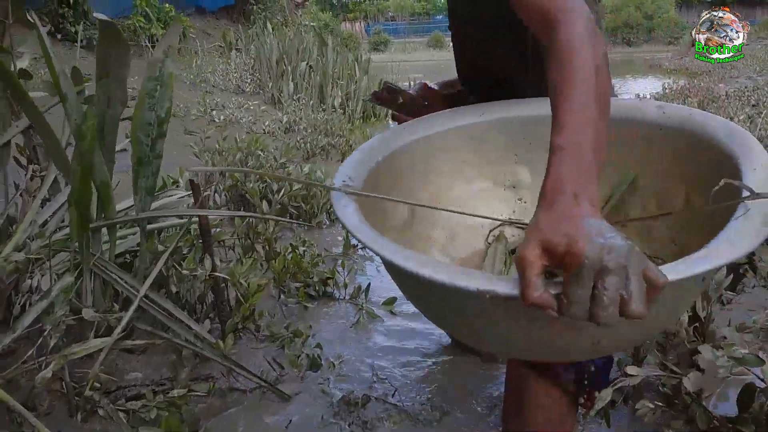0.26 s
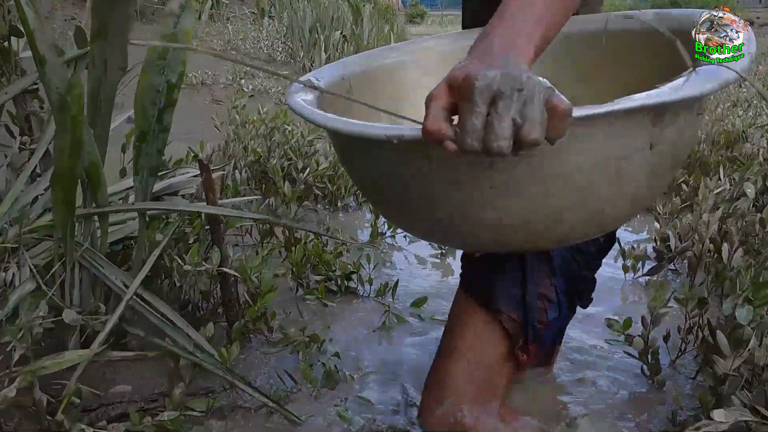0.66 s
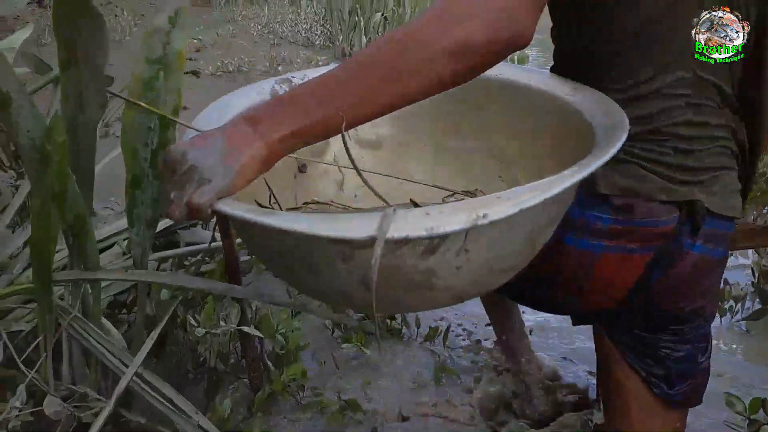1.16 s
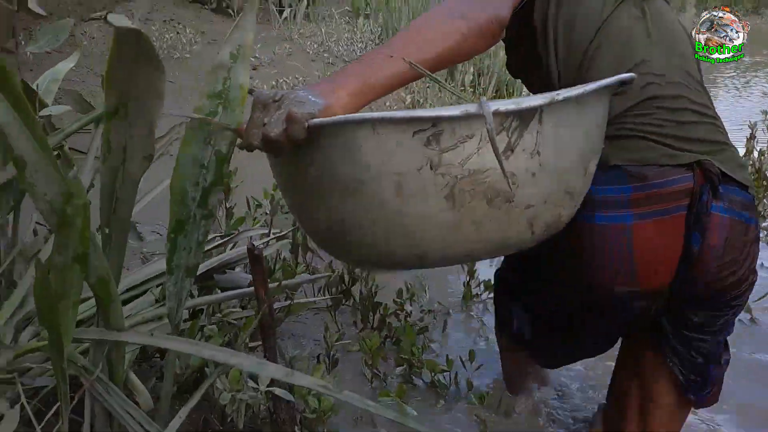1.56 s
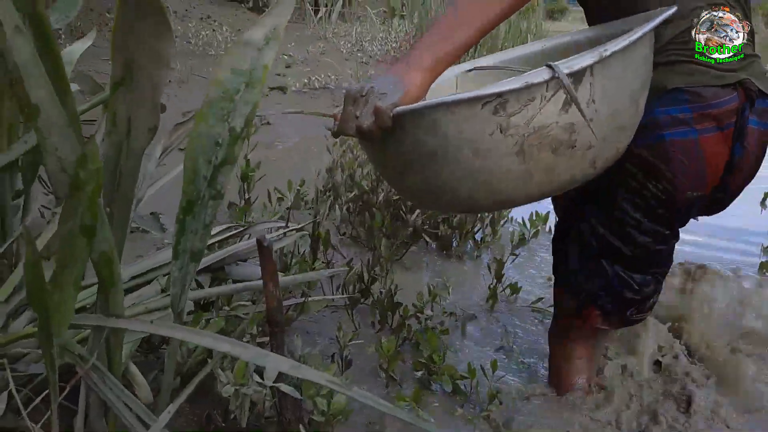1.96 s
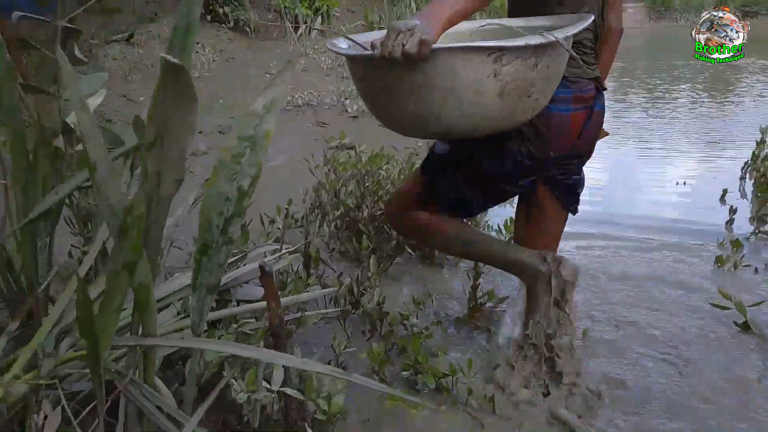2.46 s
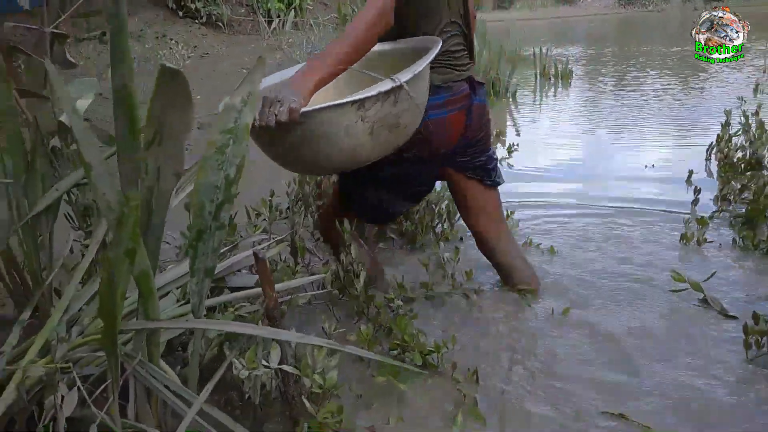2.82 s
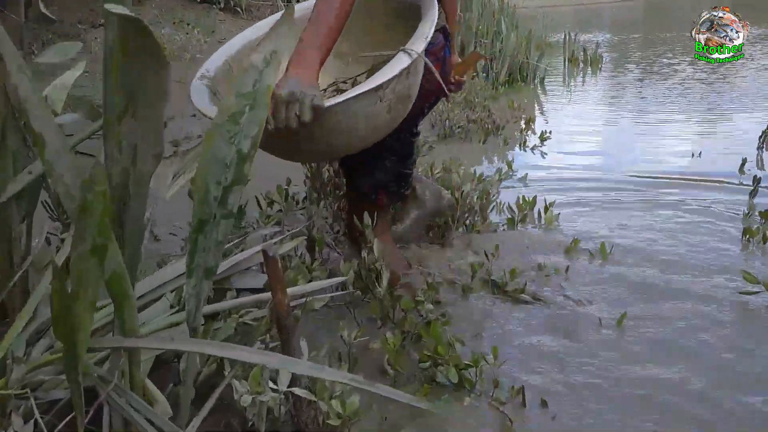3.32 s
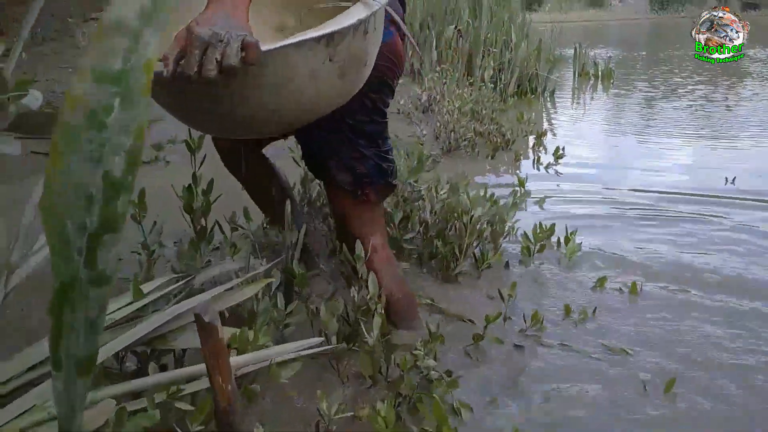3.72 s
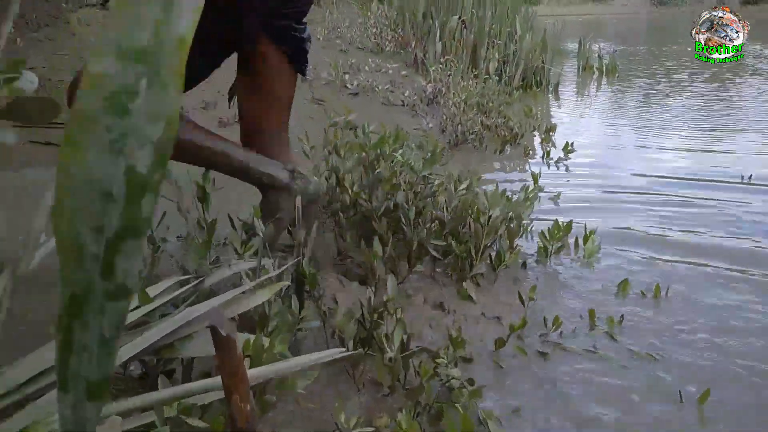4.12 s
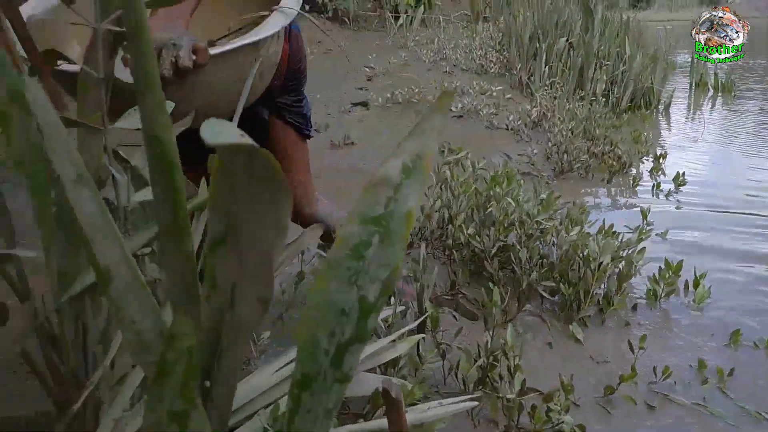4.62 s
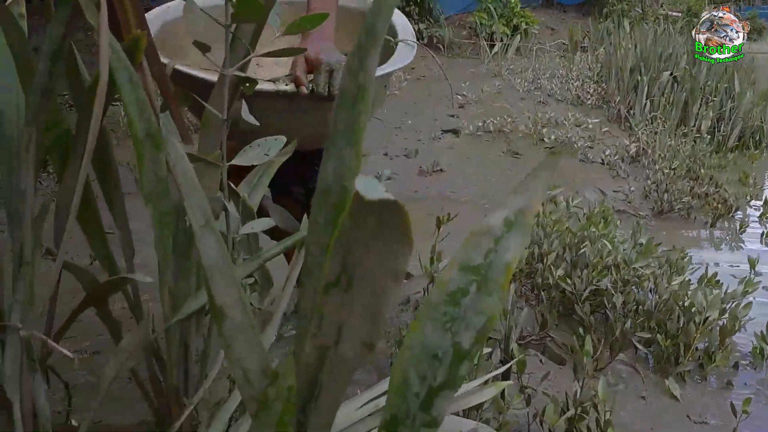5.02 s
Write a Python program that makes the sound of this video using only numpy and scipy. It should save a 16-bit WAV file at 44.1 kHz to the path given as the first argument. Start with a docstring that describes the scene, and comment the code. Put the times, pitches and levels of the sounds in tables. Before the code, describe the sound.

Someone trudges through muddy shallows and plants, crackling and squelching, with two dull heavy steps, a leaf judder and faint metal basin knocks in the wind.

```python
"""Someone wades barefoot through wet mud and low plants at a pool's edge, carrying a metal basin.
Wind rumbles throughout; from the start, swept noise and tiny ticks make each stride swish and squelch.
Stalks snap as short rings with noise bursts, and mud pockets pop as brief rising notes.
After a quieter stretch, two heavy steps thud as damped low sines with churning noise.
By the second a leaf judders in slip pulses; then leaves knock the basin's modes, and a light step lands."""
import sys
import numpy as np
from scipy import signal
from scipy.fft import rfft, irfft, next_fast_len
from scipy.io import wavfile
from scipy.ndimage import uniform_filter1d, map_coordinates

SR = 44100
rng = np.random.default_rng(int(sys.argv[2]) if len(sys.argv) > 2 else 0)


def output_pcm(signal):
    """Save a mono or channel-first signal as 16-bit PCM at the path in sys.argv[1].

    Samples are clipped to [-1, 1] before scaling.
    """
    pcm = np.clip(np.atleast_2d(signal).T, -1, 1) * 32767
    wavfile.write(sys.argv[1], SR, np.round(pcm).astype(np.int16))


N = 232774
T = np.arange(SR // 4) / SR  # time within one event, s
TOP_HZ = 15800  # upper band limit

# Wind on the microphone: t/s, rumble level before a fixed gain/dB
WIND_LEVEL = [(0.0, -63.5), (0.15, -59.5), (0.81, -61.5), (1.13, -63), (1.45, -61), (2.34, -61),
              (2.7, -56.5), (3.47, -59.5), (4.06, -58), (4.32, -54), (4.66, -62), (4.97, -59.5),
              (5.28, -62.5)]
# Short low buffets of wind: t/s, half length/s, boost/dB
WIND_BUFFETS = [(1.36, 0.072, 8.5), (1.564, 0.026, 13), (1.688, 0.059, 11), (1.826, 0.029, 10.5),
                (2.0, 0.055, 4.5), (2.657, 0.047, 0), (2.818, 0.037, 10), (2.89, 0.024, 12),
                (3.754, 0.056, 7), (4.696, .05, 6.5), (5.164, 0.094, 9.5)]
# Spectrum of the wind's rumble: f/Hz, level/dB
RUMBLE_SPECTRUM = [(12, -65), (20, -14), (53, -2.5), (71, -0.5), (106, -5), (128, -3.5), (195, -6),
                   (338, -21.5), (483, -30), (700, -30), (910, -86), (1540, -120)]
# Spectrum of the open air: f/Hz, level/dB
AIR_SPECTRUM = [(180, -39), (300, 0), (517, -20), (756, 1), (1640, -3.5), (2610, -11), (3020, -5),
                (6250, -14), (7250, -8), (9760, -19), (15500, -36)]
RUMBLE_GAIN_DB = 4
BUFFET_TOP_HZ, BUFFET_REST_DB = 117, -1.5  # buffets lift what lies below; deep gain between them

# Diffuse echo of the muddy bank: f/Hz, t60/s
BANK_DECAY = [(200, 0.48), (2000, 0.31), (10000, 0.05)]
# Correlation of left and right in diffuse sounds: f/Hz, correlation
DIFFUSE_CORRELATION = [(300, 1), (700, 0.12), (1400, 0.15), (3100, 0.66), (6800, -0.16), (15000, 0.25)]

# A leaf drags over the microphone housing: t/s, length before fade-out/s, level/dB, initial slip rate/Hz
LEAF_RUBS = [(4.273, 0.036, -53, 215), (4.314, 0.043, -38.5, 120), (4.362, 0.0325, -39.5, 110),
             (4.446, 0.016, -54, 140)]
# Spectrum of the rubbing: f/Hz, level/dB
RUB_SPECTRUM = [(60, -32), (130, 4), (270, -1), (400, -6.5), (630, -2.5), (850, -30), (1100, -17),
                (1330, -10), (1800, -20), (3000, -40), (8000, -70)]
RUB_SLOWING, RUB_EDGE_S = 0.12, 0.0047  # share of slip rate lost over a rub; fade-in and fade-out
RUB_GRIT = 0.51  # noise gain beside the slips

# Leaves strike the basin: t/s, relative level/dB, f/Hz, left-right level/dB, scrape level/dB, scrape t60/s
BASIN_KNOCKS = [(4.563, -39, 1120, 18, -2, .05), (4.5764, -28.5, 1200, 16, -22, 0.024),
                (4.5786, -32, 1940, 5, -11, 0.018), (4.5894, -39, 754, 2, 0, 0.035),
                (4.6386, -31.5, 2000, 6, -3.5, 0.033), (4.6572, -27.5, 2050, 11.5, -17, 0.052),
                (4.661, -34, 1010, 21, -11, .04), (4.6775, -29.5, 2110, 4, -3, 0.035),
                (4.679, -33.5, 1150, 4, -6.5, 0.12), (4.688, -40, 766, 7, 1, 0.048),
                (5.024, -43, 2120, 12, 0, 0.065), (5.032, -39.5, 890, 6, -5.5, 0.095),
                (5.09, -35.5, 980, 8, -9.5, 0.13), (5.111, -40, 980, 4, -3, 0.089),
                (5.1217, -38, 1850, 0, 0.5, 0.16), (5.129, -33.5, 2080, 6, 0, 0.063),
                (5.1351, -35.5, 1010, 19, 3.5, 0.037), (5.147, -34.5, 1080, 11, -10, .05),
                (5.149, -37, 2040, 10, -18, .03), (5.165, -41.5, 746, 4, -1, 0.14),
                (5.174, -40, 2100, 11, -4, 0.049), (5.186, -42.5, 850, 1, -12, .12)]
# Resonant modes of the basin: f/Hz, bandwidth/Hz, level/dB
BASIN_MODES = [(277, 47, 0.5), (727, 28, 1.5), (994, 24, 2.5), (1420, 29, -2), (1990, 41, 2.5),
               (2610, 32, 2), (3370, 110, -4)]
# Phase by which the basin's left side leads its right: f/Hz, phase/rad
BASIN_PHASE_LEAD = [(400, -0.8), (720, 1.5), (1000, 0.8), (1380, -2.5), (2000, -1.3), (2800, -1),
                    (6000, 1.5)]
# Spectrum of a leaf scraping the basin: f/Hz, level/dB
SCRAPE_SPECTRUM = [(150, 0.5), (350, -4.5), (800, -2.5), (2100, 0.5), (3500, -3), (8000, -20), (12000, -34)]
FLICK_DB, FLICK_T60_S = -5.5, 0.0063  # the leaf's own flick, heard beside the basin's ring

# Two heavy footfalls, each of several pushes, and a light one: t/s, relative level/dB, f/Hz, t60/s,
# left-right level/dB
FOOTFALLS = [(3.194, -31, 59, 0.059, -17), (3.207, -25.5, 87, 0.19, -21), (3.203, -25.5, 397, 0.034, -6),
             (3.2227, -20, 152, 0.075, -39), (3.23, -31, 233, 0.14, -13), (3.243, -31, 63.8, 0.26, -11),
             (3.263, -35, 312, 0.052, -2), (3.281, -30, 111, 0.04, -12), (4.328, -41, 206, 0.25, -18),
             (4.376, -25.5, 132, 0.051, -15), (4.392, -31, 150, .04, -13), (4.4, -14.5, 59.4, 0.081, -13),
             (4.473, -30.5, 33.2, 0.28, -11), (5.134, -34.5, 260, 0.042, -4.5)]
# Spectrum of the churning mud: multiple of the push frequency, level/dB
CHURN_SPECTRUM = [(.25, 13), (.7, 11), (1.3, 1), (2.5, -29), (8, -42), (30, -90)]
# Correlation of left and right in churning and rubbing noise: f/Hz, correlation
CHURN_CORRELATION = [(100, 0.46), (400, -0.5)]

# Air pockets in the mud ring on after they open: t/s, level/dB, initial f/Hz, t60/s, left-right level/dB
MUD_POCKETS = [(0.3231, -21.5, 1495, 0.016, -13), (0.3235, -23.5, 2050, 0.015, -18),
               (0.384, -38, 1397, 0.04, -4), (0.632, -31.5, 1230, 0.016, -2), (0.638, -41.5, 1726, 0.07, 0),
               (0.641, -47, 645, 0.16, -1), (0.427, -33.5, 3540, 0.027, 0), (1.26, -52, 1655, 0.13, -2),
               (1.331, -50, 1620, 0.21, -6), (4.245, -44, 760, 0.033, 17)]
POCKET_RISE_PER_S = 1  # share by which a pocket's pitch climbs as it shrinks

# Stalks snap and mud smacks: t/s, relative level/dB, f/Hz, left-right level/dB, relative crack level/dB,
# relative splinter level/dB, tearing t60/s
STALK_SNAPS = [(0.136, -31, 4860, -19, -20, -15, 0.015), (0.239, -36, 3430, 0, -7, -15.5, 0.018),
               (0.3228, -21.5, 1990, -27, -1, -16.5, 0.0073), (0.383, -37.5, 1620, -2, 1.5, -4.5, 0.035),
               (0.4106, -30, 7000, -2, -1.5, -15, .028), (0.426, -22, 3740, -2, -11, -22, 0.0058),
               (0.428, -32, 3700, 2, -11, -7.5, .014), (0.4455, -33, 5200, -3, -2, -13, .01),
               (0.631, -20.5, 2480, 0, -18, -13.5, 0.013), (0.6345, -37, 2880, -5, -12, -15, .015),
               (0.6532, -30.5, 4260, 2, -5, -11.5, 0.017), (0.689, -37.5, 1480, -5, -4, -13, .008),
               (0.7115, -34, 2560, -10, -4, -16, 0.0072), (0.8757, -36, 3830, 26, 4.5, -18, .006),
               (1.3805, -29, 1690, -1, -7, -16.5, 0.02), (2.5454, -29.5, 4440, -9, -6.5, -16, 0.005),
               (2.5549, -25.5, 4200, -11, -14, -16, 0.021), (2.5914, -36, 4500, -14, -7, -15, .008),
               (2.5963, -26, 3200, -8, 1, -15, 0.016), (2.643, -28.5, 4600, -5, 0, -18.5, 0.0071),
               (2.692, -29, 3850, -3, -10, -11.5, 0.01), (2.702, -30, 3700, -7, -10, -20, .007),
               (2.729, -32, 5300, -12, -6, -16, .018), (2.79, -46, 2000, -12, -9, -14, 0.0085),
               (2.816, -46, 3230, -17, -14, -14, 0.016), (2.838, -42, 2600, -17, -9, -13, 0.0089),
               (2.9603, -36, 2400, -18, -14, -19, .012), (3.0198, -31.5, 3320, -10, -14, -13.5, .008),
               (3.2034, -16, 2900, -8, 11, -33, 0.0045), (3.244, -36, 2170, -10, -9, -22, .004),
               (3.264, -29, 2470, -10, -7, -18.5, .007), (3.385, -37, 2500, -7, -14, -18, .014),
               (3.394, -37, 890, -11.5, -12, -15.5, 0.019), (3.414, -23.5, 4070, -21, -20, -16, 0.0068),
               (3.498, -35.5, 690, -22, -9, -16, 0.011), (3.5797, -43, 644, -12, -14, -9.5, 0.014),
               (4.018, -40.5, 820, -24, -12, -14, .008), (4.0864, -37.5, 5540, -9, -19, -21, 0.031),
               (4.1223, -44.5, 1130, 7, 0, -6, .01), (4.1863, -37.5, 6300, -14, 2, -6.5, 0.038),
               (4.243, -35, 1020, 15, -16, -15, 0.025), (4.255, -34, 2170, 7, -4, -11, .03),
               (4.3194, -26, 6550, -5, 3, -14.5, 0.014), (4.322, -24.5, 6000, -1, 7, -14, .026),
               (4.418, -30, 5600, -6, -5, -21, .015), (4.547, -38.5, 3400, 3, -7, -13, .006),
               (4.5664, -32.5, 8100, -3, 7, -20, 0.016), (4.5772, -33, 5700, -1, 9, -24, 0.0093),
               (4.6779, -32, 4200, 2, 1, -19, .01), (4.7353, -37, 3300, 7, 6, -20, 0.0099),
               (4.884, -39, 7740, -2, 10.5, -9.5, 0.017), (5.061, -33, 5140, 2, -6, -24, 0.023),
               (5.13, -25.5, 3400, 3, -13, -21, 0.034)]
# Spectrum of a stalk's crack: f/Hz, level/dB
CRACK_SPECTRUM = [(300, 18), (1200, -9), (2200, -15), (3000, 6), (5500, 6), (7500, 10.5), (9800, 11),
                  (11800, -10), (15500, -39)]
# Spectrum of splintering and of single drops and twigs: f/Hz, level/dB
SPLINTER_SPECTRUM = [(200, -4.5), (600, -3), (1500, 4), (3500, 7.5), (5500, 3), (7500, 7.5), (9500, -18),
                     (11500, -16), (15500, -57)]
SPLINTER_T60_S = 0.051
TEAR_REF_S = 0.015  # a tear this long is as strong as its first break

# A leg sweeps through wet leaves and mud: t of fastest motion/s, rise/s, fall/s, swish level/dB,
# squelch level/dB, hollow f/Hz, level of the bright part relative to swish/dB
LEG_SWEEPS = [(0.01, .1, 0.094, -58.5, -60, 1860, -6), (0.135, 0.43, 0.25, -57, -55.5, 1780, -0.5),
              (0.479, 0.19, 0.032, -47, -51, 2100, 5), (0.59, 0.26, 0.066, -49, -53, 1850, 1.5),
              (0.655, 0.034, 0.051, -44.5, -45.5, 1460, -2.5), (0.713, 0.032, 0.075, -47.5, -48, 1790, 3),
              (0.973, 0.031, 0.041, -55.5, -50, 1670, -2), (1.16, 0.21, 0.057, -60, -58, 1620, 5),
              (1.261, 0.044, 0.56, -54.5, -54.5, 1730, 1.5), (1.363, 0.18, 0.091, -49, -48.5, 1930, -0.5),
              (1.58, 0.045, 0.068, -60.5, -64.5, 1070, 2), (1.86, 0.46, 0.07, -71.5, -71.5, 980, 6.5),
              (2.06, 0.1, 0.075, -72, -70, 1166, 9.5), (2.405, 0.32, 0.75, -61.5, -69, 1530, -4),
              (2.694, 0.065, 0.086, -39.5, -46.5, 1990, -1.5), (2.825, 0.18, 0.13, -43.5, -48, 1300, -0.5),
              (2.96, 0.38, 0.26, -49.5, -53.5, 1670, -0.5), (3.15, 0.19, 0.37, -49.5, -75, 1450, -2.5),
              (3.26, 0.11, 0.042, -48.5, -52.5, 639, -10), (3.53, 1, 0.72, -54, -71, 1260, -6.5),
              (3.7, 0.35, 0.087, -56.5, -80, 1380, -2), (3.815, 0.1, 0.15, -52, -63, 1540, -5.5),
              (4.0, 0.3, 0.36, -61.5, -67, 1400, -6), (4.262, 0.16, 0.082, -46.5, -47, 1740, 1.5),
              (4.336, 0.11, 0.092, -38.5, -48, 1110, 3.5), (4.414, 0.053, 0.13, -37, -47, 1210, 1.5),
              (4.589, 0.041, 0.026, -40.5, -47.5, 1050, 1.5), (4.684, 0.083, 0.04, -50.5, -46.5, 1200, -7),
              (4.82, 0.39, 0.25, -53, -63, 1570, -1.5), (4.94, 0.099, 0.15, -51.5, -56, 1830, 6),
              (5.062, 0.065, 0.1, -46, -53, 1100, -1.5), (5.14, 0.088, 0.3, -48.5, -54.5, 1300, 1.5)]
# Place of the legs, wider once among the plants: t/s, left-right level/dB, width (0-1)
WALKER_PATH = [(0, -6, 0.8), (0.45, -2.5, 0.64), (1.4, -3.5, 0.64), (2.45, -4, 1), (2.8, -9, 1),
               (3.1, -5.5, 1), (3.95, -5.5, 1), (4.2, 2.5, 1), (5.28, 0.5, 1)]
# Spectrum of the swishing leaves: f/Hz, level/dB
SWISH_SPECTRUM = [(200, -2.5), (350, 4), (500, 2.5), (700, 9), (1000, -12.5), (1600, -7), (2600, -6.5),
                  (4000, -6.5), (5500, -5.5), (7300, -3.5), (9500, -11), (11200, -23), (14000, -27),
                  (15500, -43)]
SWEEP_DROP_DB, SWEEP_ROUNDNESS = 19.5, 0.88  # drop over one rise or fall; 1 = pointed, 2 = bell-shaped
TRICKLE_DB, TRICKLE_T60_S = -17, 2  # water runs off after each sweep
LAP_DB, LAP_HZ = -70.5, 1010  # steady squelch floor for the pool lapping between steps
DRIP_DB, DRIP_SIZE_DB, DRIP_T60_S = -13, 3.4, 0.0035  # drops and small twigs, level relative to swish
SURGE_DB, SURGE_KNOTS_PER_S = 1.3, 24  # water comes off the legs in uneven surges
SHEEN_HZ = 5560  # the bright part of the swish lies above this


def amp(db):
    """Logarithmic level: decibels become an amplitude ratio."""
    return 10 ** (np.asarray(db) / 20)


def unit(x):
    """Power normalisation: the signal is scaled to rms 1."""
    return x / np.sqrt(np.mean(x ** 2) + 1e-20)


def fade(t60, t=T):
    """Exponential damping: the amplitude falls 60 dB in t60 seconds."""
    return np.exp(-np.log(1000) * t / np.maximum(t60, 1e-4))


def along(points, hz):
    """Logarithmic frequency scale: (f/Hz, value) points are interpolated along it."""
    f, v = np.transpose(points)
    return np.interp(np.log(hz + 1), np.log(f + 1), v)


def curves(rows):
    """Linear interpolation in time: each column after t/s becomes one value per sample."""
    s, *cols = np.transpose(rows)
    return [np.interp(np.arange(N) / SR, s, c) for c in cols]


def wobble(rate):
    """Band-limited fluctuation: a smooth curve through random knots, rate of them per second."""
    knots = rng.standard_normal(int(N * rate / SR) + 4)
    return map_coordinates(knots, [np.arange(N) * rate / SR])


def filtered(x, response):
    """Linear filtering: the spectrum is multiplied by a response of frequency."""
    n = x.shape[-1]
    m = next_fast_len(n + SR // 4)
    return irfft(rfft(x, m) * response(np.fft.rfftfreq(m, 1 / SR)), m)[..., :n]


def coloured(x, spectrum):
    """Spectral shaping: a (f/Hz, level/dB) curve colours the signal, at rms 1."""
    return unit(filtered(x, lambda hz: amp(along(spectrum, hz))))


def spread(pair, alike):
    """Interchannel correlation: unrelated signals mix as mid and side to a given likeness."""
    def mid_side_gains(hz):
        """Correlation as an angle: its cosine weights mid, its sine side."""
        turn = np.arccos(np.clip(along(alike, hz), -1, 1)) / 2
        return np.array([np.cos(turn), np.sin(turn)])

    mid, side = filtered(pair, mid_side_gains)
    return np.array([mid + side, mid - side])


def narrowed(pair, width):
    """Mid-side balance: less side narrows the image, with a gain to offset lost power; 1 is unchanged."""
    mid = (pair[0] + pair[1]) / 2
    side = width * (pair[0] - pair[1]) / 2
    return np.array([mid + side, mid - side]) / np.sqrt(.65 + .35 * width ** 2)


def panned(pan_db):
    """Level-difference localisation: left and right gains of constant power."""
    g = amp(np.array([pan_db, -pan_db]) / 2).reshape(2, -1)
    return g / np.sqrt(np.mean(g ** 2, axis=0))


def add(track, s, sound):
    """Superposition: a stereo sound is added to the track at s seconds."""
    start = max(round(s * SR), 0)
    part = track[:, start:start + sound.shape[1]]
    part += sound[:, :part.shape[1]]


def crackle(size_db, t60, count):
    """Random impulses: tiny damped ringing ticks of every pitch, a few much larger than the rest."""
    when, pitch, size, life, phase = rng.random((count, 5)).T[..., None]
    t = T[:SR // 200]
    ticks = amp(-size_db * np.log(np.maximum(size, .01))) * fade(t60 * (.5 + life), t)
    index = ((when * N).astype(int) + np.arange(len(t))).ravel()

    def ear(turn):
        """Superposition: all ticks are summed at one phase offset, in turns."""
        rings = ticks * np.sin(2 * np.pi * (pitch * TOP_HZ * t + turn))
        return np.bincount(index, rings.ravel(), N)[:N]

    return unit(np.array([ear(0), ear(phase)]))


def pop(hz, cycles, tear, t60):
    """Damped oscillation with ragged breaks: a ring swells and dies, then weakening copies follow."""
    ring = np.sin(2 * np.pi * hz * T) * fade(cycles / hz) * (1 - fade(6 / hz))
    band = signal.butter(5, [.62 * hz, 10200], "bandpass", fs=SR, output="sos")
    ring = signal.sosfilt(band, ring)
    shared = rng.standard_normal(len(T)) ** 3  # cubing makes the breaks sparse
    separate = rng.standard_normal((2, len(T))) ** 3
    breaks = (shared + .7 * separate) * fade(t60) * (T > .0008)
    copies = signal.fftconvolve(ring[None], breaks, axes=1)[:, :len(T)]
    copies *= np.linalg.norm(ring) / np.linalg.norm(copies, axis=1, keepdims=True)
    return (ring + tear * copies) / np.abs(ring).max()


def burst(spectrum, t60):
    """Damped random excitation: ragged coloured noise swells and dies."""
    clumps = amp(2.5 * unit(uniform_filter1d(rng.standard_normal(len(T)), size=50)))
    noise = coloured(spread(rng.standard_normal((2, len(T))), DIFFUSE_CORRELATION), spectrum)
    return unit(noise * clumps) * fade(t60) * (1 - fade(0.0024))


def wind():
    """Turbulent pressure noise: a low, nearly common rumble surges in deep buffets under faint open air."""
    rumble_db, = curves(WIND_LEVEL)
    rumble_correlation = [(60, 0.93), (150, 0.96), (400, 0.58)]
    rumble = coloured(spread(rng.standard_normal((2, N)), rumble_correlation), RUMBLE_SPECTRUM)
    deep = filtered(rumble, lambda hz: 1 / (1 + (hz / BUFFET_TOP_HZ) ** 6))
    buffet_db = np.full(N, BUFFET_REST_DB)
    for s, length, db in WIND_BUFFETS:
        buffet_db += db * np.exp(-((np.arange(N) / SR - s) / length) ** 2)
    air = coloured(spread(rng.standard_normal((2, N)), DIFFUSE_CORRELATION), AIR_SPECTRUM)
    gusts_db = 1.2 * wobble(14)
    buffeted = rumble - deep + amp(buffet_db) * deep
    return amp(rumble_db + RUMBLE_GAIN_DB + gusts_db) * buffeted + amp(-69.0) * air


def bank(x):
    """Diffuse reverberation: mud bank and plants answer 5 ms late with frequency-dependent decay."""
    hz, t, z = signal.stft(rng.standard_normal((2, len(T))), SR, nperseg=256)
    decay = fade(along(BANK_DECAY, hz)[:, None], t)
    tail = signal.istft(z * decay, SR, nperseg=256)[1]
    delayed = np.pad(x.mean(0), (SR // 200, 0))
    return signal.fftconvolve(delayed[None], tail / np.linalg.norm(tail[0]), axes=1)[:, :N]


def glanced(x, share, count):
    """Early reflection: each side adds glances off wet ground and plants within 4 ms."""
    paths = np.zeros((2, SR // 250))
    for side in paths:
        delays = rng.integers(8, len(side), count)
        side[delays] = rng.choice([-1, 1], count) * share / np.sqrt(count)
    paths[:, 0] = 1  # direct sound
    return signal.fftconvolve(x, paths, axes=1)[:, :N] / np.sqrt(1 + share ** 2)


def rubbing():
    """Stick-slip friction: a leaf's slowing judder drives the two microphone ports in opposite directions."""
    out = np.zeros((2, N))
    for s, length, db, rate in LEAF_RUBS:
        uneven = 1 + .07 * wobble(120)[:len(T)]
        slowing = 1 - RUB_SLOWING * np.minimum(T / length, 1)
        turns = np.cumsum(rate * uneven * slowing) / SR
        slips = np.diff(np.floor(turns), prepend=-1)  # one pulse per whole turn
        slips = slips * amp(rng.normal(0, 2.5, len(T)))
        grit = spread(rng.standard_normal((2, len(T))), CHURN_CORRELATION)
        opposed = np.array([[1], [-1]]) * coloured(slips, RUB_SPECTRUM)
        judder = opposed + RUB_GRIT * coloured(grit, RUB_SPECTRUM)
        fade_in = np.clip(T / RUB_EDGE_S, 0, 1)
        fade_out = np.clip((length - T) / RUB_EDGE_S + 1, 0, 1)
        add(out, s, amp(db) * fade_in * fade_out * judder)
    return out


def basin():
    """Modal resonance: stiff leaves flick and scrape the basin, whose ring arm and hip damp."""
    blows = np.zeros((2, N))
    for s, db, hz, pan_db, scrape_db, t60 in BASIN_KNOCKS:
        flick = pop(hz, cycles=hz * FLICK_T60_S, tear=0.98, t60=0.017)
        scrape = amp(scrape_db) * burst(SCRAPE_SPECTRUM, t60)
        add(blows, s, amp(db) * panned(pan_db) * (flick + scrape))

    def response(f):
        """Modal superposition: the direct flick joins the modes, with a phase lead between sides."""
        metal = sum(amp(db) * 1j * f * width / (centre ** 2 - f * f + 1j * f * width)
                    for centre, width, db in BASIN_MODES)
        sides = np.exp(.5j * np.outer([1, -1], along(BASIN_PHASE_LEAD, f)))
        return (amp(FLICK_DB) + metal) * sides

    return filtered(blows, response)


def thuds():
    """Heavily damped impact: weight landing in soft mud gives a low push with churning noise around it."""
    out = np.zeros((2, N))
    for s, db, hz, t60, pan_db in FOOTFALLS:
        push = np.sin(2 * np.pi * hz * T)
        noise = spread(rng.standard_normal((2, len(T))), CHURN_CORRELATION)
        churn = coloured(noise, np.array(CHURN_SPECTRUM) * [hz, 1])
        loose = np.clip((hz / 380) ** 2, 0, .9)  # the higher ones are mostly churn
        swell = fade(t60) * (1 - fade(0.01))
        body = (1 - loose) * push + 1.38 * loose * churn
        add(out, s, amp(db - 7.0) * panned(pan_db) * swell / swell.max() * body)
    return out


def pockets():
    """Cavity resonance: each shrinking air pocket rings with one short, slightly rising note."""
    out = np.zeros((2, N))
    for s, db, hz, t60, pan_db in MUD_POCKETS:
        cycles = hz * (T + POCKET_RISE_PER_S * T ** 2 / 2)
        note = np.sin(2 * np.pi * cycles) * fade(t60) * (1 - fade(0.0048))
        add(out, s, amp(db) * panned(pan_db) * note)
    return out


def snaps():
    """Brittle fracture: a pitched pop and bright crack, clean or torn, are trailed by splintering."""
    out = np.zeros((2, N))
    for s, db, hz, pan_db, crack_db, splinter_db, t60 in STALK_SNAPS:
        stalk = pop(hz, cycles=2.6, tear=np.sqrt(t60 / TEAR_REF_S), t60=t60)
        crack = amp(crack_db - 3.5) * burst(CRACK_SPECTRUM, t60)
        trail = amp(splinter_db + 7.0) * burst(SPLINTER_SPECTRUM, SPLINTER_T60_S)
        add(out, s, amp(db - 5.0) * ((stalk + crack) * panned(pan_db) + trail))
    return out


def hollow(x, centre_hz, octaves):
    """Moving cavity resonance: the hole around the foot shifts its broad peak as it opens and closes."""
    hz, t, z = signal.stft(x, SR, nperseg=256)
    centre = np.interp(t * SR, np.arange(N), centre_hz)
    gain = np.exp(-(np.log2((hz[:, None] + 1) / centre) / octaves) ** 2 / 2)
    gain = gain / np.linalg.norm(gain, axis=0)
    return unit(signal.istft(z * gain, SR, nperseg=256)[1][:, :N])


def sweeping():
    """Power addition: sweeps swell, die and leave a trickle; squelch power weights the hollow's pitch."""
    swish, sheen, squelch = np.zeros(N), np.zeros(N), np.full(N, amp(LAP_DB) ** 2)
    pitch = squelch * LAP_HZ
    for s, rise, fall, swish_db, squelch_db, hz, bright_db in LEG_SWEEPS:
        t = np.arange(N) / SR - s
        distance = np.minimum(np.maximum(-t / rise, t / fall), 10)
        motion = amp(-SWEEP_DROP_DB * distance ** SWEEP_ROUNDNESS)
        trickle = amp(TRICKLE_DB) * fade(TRICKLE_T60_S, np.abs(t)) * (t > 0)
        power = motion ** 2 + trickle ** 2
        swish += amp(swish_db) ** 2 * power
        sheen += amp(swish_db + bright_db) ** 2 * power
        squelch += amp(squelch_db) ** 2 * power
        pitch += amp(squelch_db) ** 2 * power * hz
    return np.sqrt(swish), np.sqrt(sheen), np.sqrt(squelch), pitch / squelch


def strides():
    """Frictional and bubble noise: legs drag through leaves and mud with swish, drops and squelch."""
    swish_gain, sheen_gain, squelch_gain, centre_hz = sweeping()
    pan_db, width = curves(WALKER_PATH)
    leaves = crackle(size_db=3.4, t60=.0025, count=17000) + 1.1 * rng.standard_normal((2, N))
    leaves = coloured(spread(leaves, DIFFUSE_CORRELATION), SWISH_SPECTRUM)
    swish = unit(filtered(leaves, lambda hz: 0.23 + 1 / (1 + (2100 / (hz + 1)) ** 4)))
    drips = crackle(DRIP_SIZE_DB, DRIP_T60_S, count=1500)
    drips = coloured(spread(drips, DIFFUSE_CORRELATION), SPLINTER_SPECTRUM)
    surges = amp(SURGE_DB * wobble(SURGE_KNOTS_PER_S))
    spray = (swish + amp(DRIP_DB) * drips) * surges
    sheen = filtered(spray, lambda hz: 1 / (1 + (SHEEN_HZ / (hz + 1)) ** 6))
    bubbles = crackle(size_db=2, t60=.006, count=12000) + 1.1 * rng.standard_normal((2, N))
    squelch = hollow(spread(bubbles, DIFFUSE_CORRELATION), centre_hz, octaves=0.93)
    catching = amp(.8 * wobble(50) + 1.1 * wobble(250))  # leaves catch and slip
    wet = swish_gain * (spray - sheen) + sheen_gain * sheen + squelch_gain * squelch
    return narrowed(wet, width) * catching * panned(pan_db)


def scene():
    """Superposition in the open: steps and basin are near, with reflections, microphone contact and wind."""
    hits, knocks = snaps() + pockets(), basin()
    steps = glanced(strides(), share=.45, count=8)
    near = steps + glanced(hits, share=.25, count=8) + knocks
    echo = amp(-24.0) * bank(hits + knocks)
    return near + echo + thuds() + rubbing() + wind()


def record(dry):
    """Band limitation: the microphone keeps nothing at or above its upper limit."""
    return filtered(dry, lambda hz: hz < TOP_HZ)


dry = scene()
out = record(dry)
output_pcm(out)
```